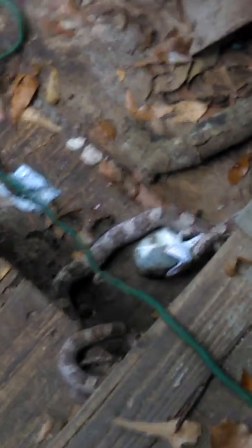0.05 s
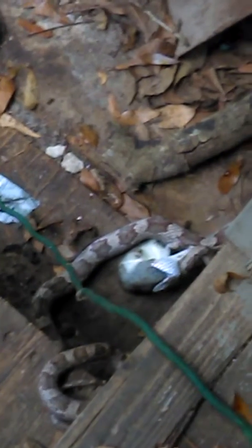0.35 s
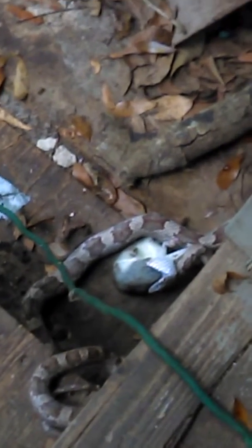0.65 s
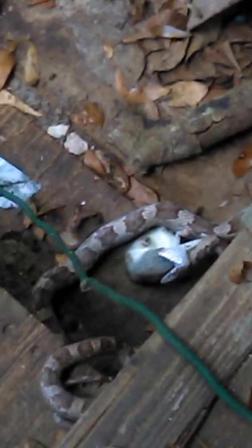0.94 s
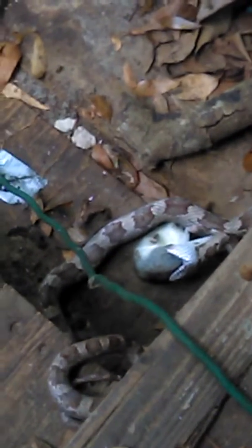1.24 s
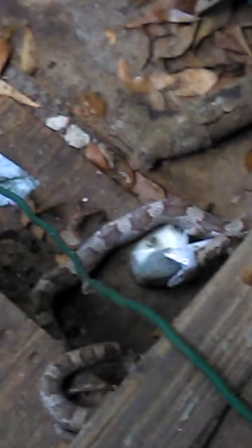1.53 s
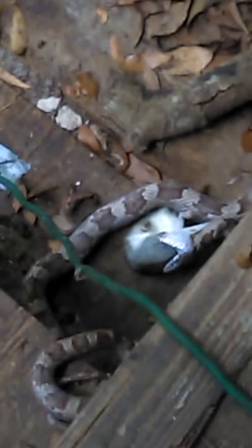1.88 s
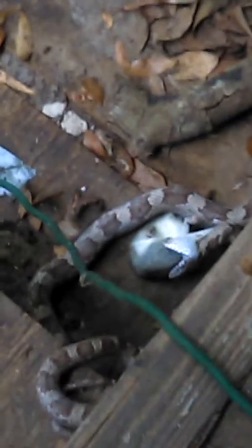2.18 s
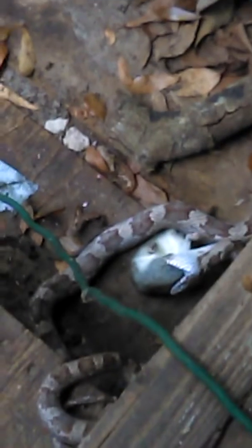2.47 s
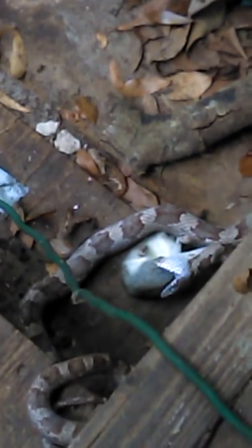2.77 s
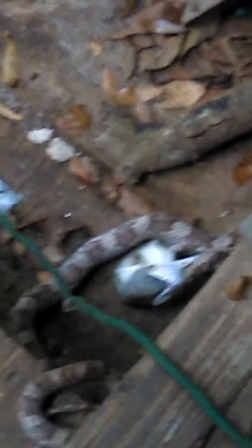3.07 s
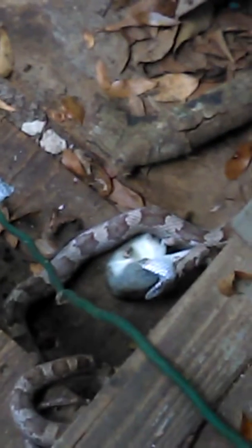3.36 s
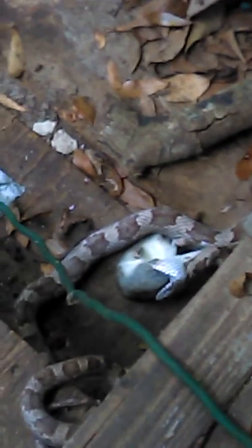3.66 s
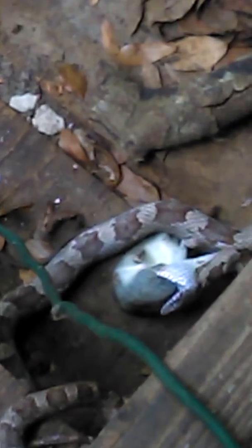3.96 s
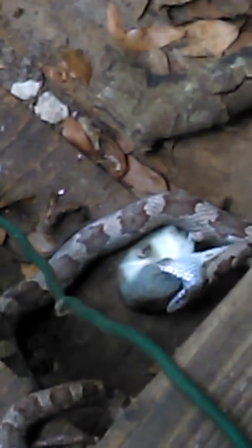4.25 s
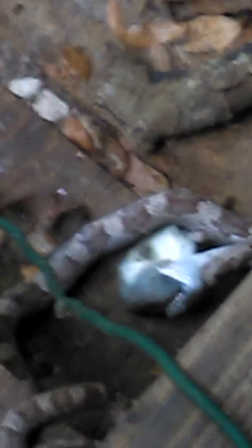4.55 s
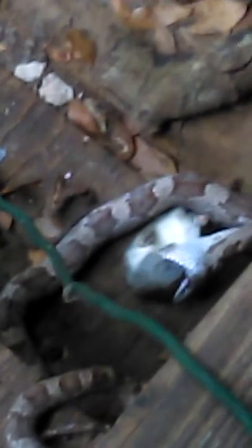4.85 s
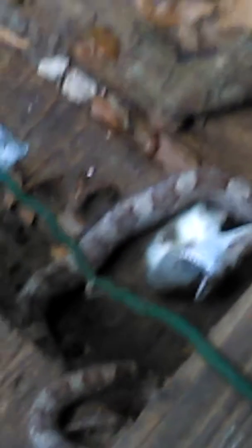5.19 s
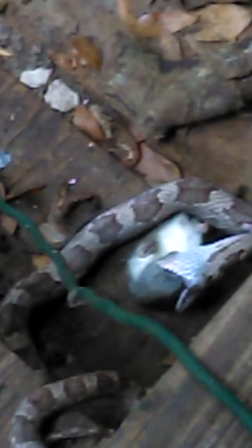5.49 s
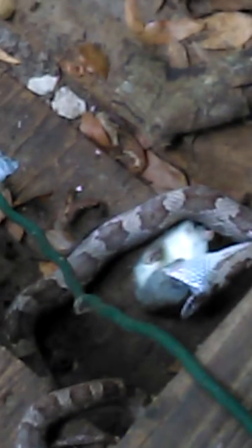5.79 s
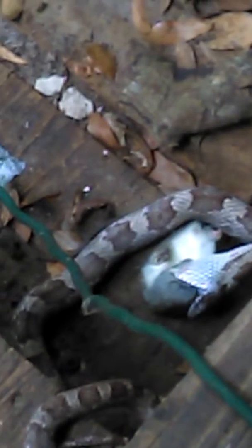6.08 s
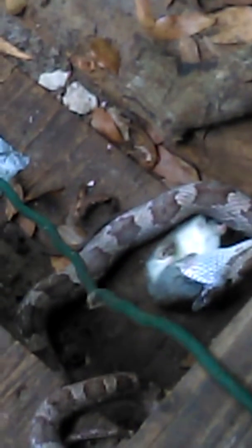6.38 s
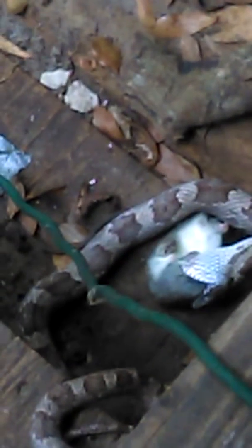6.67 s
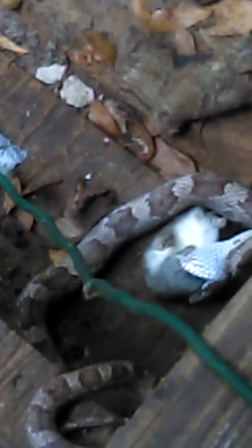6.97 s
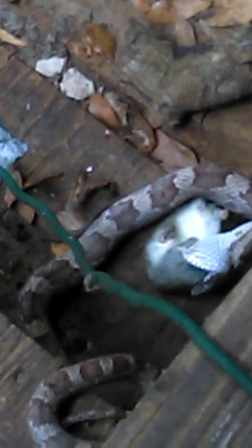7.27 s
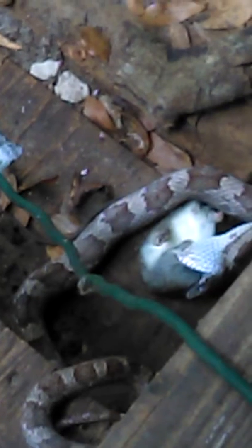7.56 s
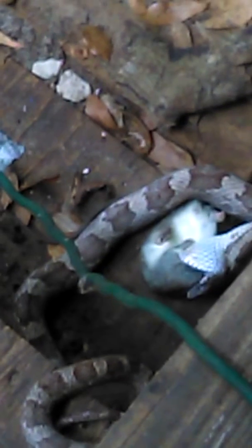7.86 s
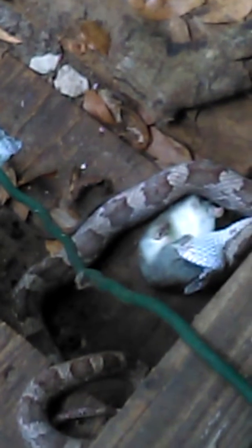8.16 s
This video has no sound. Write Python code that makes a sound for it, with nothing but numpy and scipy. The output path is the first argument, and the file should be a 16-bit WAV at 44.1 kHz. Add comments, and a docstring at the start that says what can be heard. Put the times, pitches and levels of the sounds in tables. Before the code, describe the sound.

Quiet outdoor rumble with a far hawk-like bird calling three times, faint dry leaves, one loud pop and a few microphone handling clicks.

```python
"""Hawk-like screams in a wooded yard

Over the low rumble of far traffic and a machine's faint whine, a distant bird screams three times:
a hoarse harmonic voice that slides down in pitch and echoes among the trunks.
Dry leaves rustle in short sprays of crackles. A hand-held camera ticks as its shell rings and thuds
under shifting fingers, and a voltage step pops once in the right channel."""
import sys
import numpy as np
from scipy import signal
from scipy.fft import rfft, irfft, next_fast_len
from scipy.io import wavfile

SR = 44100
rng = np.random.default_rng(int(sys.argv[2]) if len(sys.argv) > 2 else 0)


def generate_wav(sig):
    """Save sig (samples, or channels by samples) to the path in sys.argv[1] as 16-bit PCM at SR."""
    pcm = np.round(np.clip(np.atleast_2d(sig).T, -1, 1) * 32767).astype(np.int16)
    wavfile.write(sys.argv[1], SR, pcm)


N = 362943
T = np.arange(N) / SR


def amp(db):
    """Amplitude ratio of a level in decibels."""
    return 10 ** (np.asarray(db) / 20)


def unit(x):
    """Normalisation to rms 1."""
    return x / np.sqrt(np.mean(x ** 2) + 1e-20)


def read(points, hz):
    """Interpolation of a spectrum on a log-frequency axis."""
    f, value = np.transpose(points)
    return np.interp(np.log(hz + 1), np.log(f + 1), value)


def add(mix, s, sound):
    """Superposition: a sound joins the mix at time s."""
    part = mix[:, max(round(s * SR), 0):][:, :sound.shape[1]]
    part += sound[:, :part.shape[1]]


def colour(x, gain):
    """Zero-phase filtering by a gain given as a function of Hz."""
    size = next_fast_len(x.shape[-1])
    return irfft(rfft(x, size) * gain(np.fft.rfftfreq(size, 1 / SR)), size)[..., :x.shape[-1]]


def hump(hz, centre_hz, octaves):
    """A Gaussian pass band on the log-frequency axis."""
    return np.exp(-.5 * (np.log2((hz + 1) / centre_hz) / octaves) ** 2)


def wander(size, hz):
    """Random modulation: noise of rms 1, low-passed near hz."""
    return unit(colour(rng.standard_normal(size), lambda f: np.exp(-(f / hz) ** 2)))


def scatter(from_s, db, spread_db, count):
    """Jittered timing, one event in each equal slot: rows of (time [s], level [dB])."""
    place, size = rng.uniform(-1, 1, (count, 2)).T
    slots = np.arange(count) + (place + 1) / 2
    return np.column_stack([from_s + (N / SR - from_s) * slots / count, db + spread_db * size])


def traffic_and_air(flutter_db=.5, swell_db=.5):
    """Partial coherence: far traffic and hiss, alike at both ears in the bass, with droning bands."""
    # noise floor at each ear: (frequency [Hz], spectral density [dB per Hz])
    floor_left = [(15, -112), (35, -82), (56, -81.5), (92, -83), (120, -81), (155, -86), (300, -92.5),
                  (440, -93), (720, -100), (1150, -99), (1800, -103), (5600, -103.5), (9500, -112),
                  (16000, -119)]
    floor_right = [(15, -82), (35, -80), (56, -68), (92, -77), (120, -70), (155, -77.5), (300, -81.5),
                   (480, -86.5), (850, -90), (1750, -108.5), (3600, -105.5), (8300, -105), (12000, -115),
                   (16000, -120)]
    # bands of the far drone: (centre [Hz], width [Hz], left lift [dB], right lift [dB])
    drone_bands = [(129.1, 4.4, -3, 7), (316.5, 17.7, 6.5, 5), (387, 37, -5.5, -1.5), (449, 28, 7, 1.5),
                   (712, 40, 2.5, 8), (818, 10.4, 7, 7)]
    # likeness of the two ears: (frequency [Hz], correlation [-1 to 1])
    coherence = [(60, 1), (130, 0.88), (290, 0.83), (640, 0.19), (1410, 0.19), (3100, -0.24),
                 (6820, -0.044), (15000, 0.052)]
    size = next_fast_len(N, True)
    hz = np.fft.rfftfreq(size, 1 / SR)
    left, independent = rfft(rng.standard_normal((2, size)))
    shared = np.clip(read(coherence, hz), -1, 1)
    right = shared * left + np.sqrt(1 - shared ** 2) * independent
    level_db = np.array([read(floor_left, hz), read(floor_right, hz)])
    for centre, width, left_db, right_db in drone_bands:
        level_db += np.outer([left_db, right_db], 1 / (1 + (2 * (hz - centre) / width) ** 2))
    noise = irfft(np.array([left, right]) * amp(level_db), size)[:, :N] * np.sqrt(SR / 2)
    return noise * amp(flutter_db * wander(N, 18) + swell_db * wander(N, 3.1))


def machine_whine(pitch_hz=1050, waver_hz=1.77, left_db=-78.5, right_db=-80):
    """Frequency modulation: a far machine's pure tone wavers slightly in pitch."""
    cycles = np.cumsum(pitch_hz + waver_hz * wander(N, 5.6)) / SR
    return amp([[left_db], [right_db]]) * unit(np.sin(2 * np.pi * cycles))


def grip_thuds(rise_s=.0043, fade_s=.046, octaves=.73, left_db=-10, fidget_hz=72):
    """Structure-borne sound: fingers shifting on the camera make low thuds, mostly on the right."""
    # firmer bumps of the grip: (time [s], level [dB], band centre [Hz])
    bumps = [(0.389, -49, 168), (1.712, -44.5, 110), (6.945, -43, 190), (7.356, -43.5, 101)]
    out, t = np.zeros((2, N)), T[:SR // 2]
    fidgets = [(s, db, fidget_hz) for s, db in scatter(from_s=6.76, db=-47.5, spread_db=2.5, count=17)]
    envelope = (1 - np.exp(-t / rise_s)) * np.exp(-t / fade_s)
    for s, db, centre_hz in bumps + fidgets:
        thud = unit(colour(rng.standard_normal(len(t)), lambda f: hump(f, centre_hz, octaves)))
        add(out, s, thud * envelope / envelope.max() * amp([[db + left_db], [db]]))
    return out


def shell_ticks(contact_s=.00006, scrape_db=-19, scrape_t60=.029):
    """Damped modes: the camera's plastic shell rings briefly, with a scrape and a dull knock."""
    # ticks of the shell: (time [s], nominal level [dB], knock weight [ratio], left minus right [dB])
    ticks = [(1.6952, -35, 0.31, 5), (4.6125, -46, .1, 10), (4.6238, -35.5, 1, 2), (4.629, -48, 0.18, 24)]
    # ringing modes: (nominal frequency [Hz], relative level [dB], 60 dB decay time [s])
    shell_modes = [(4300, 5.5, 0.0028), (6300, 6.5, 0.0025), (9700, 3, 0.0027), (11400, 6, 0.0017)]
    knock_modes = [(300, .0086), (800, .0049)]  # (frequency [Hz], 60 dB decay time [s])
    out, t = np.zeros((2, N)), T[:SR // 20]
    for s, db, knock_weight, pan_db in ticks:
        # each mode sounds 5-13 % below nominal, differently at each tick and ear
        ring = sum(amp(level - 60 * t / t60) * np.sin(2 * np.pi * hz * rng.uniform(.87, .95, (2, 1)) * t)
                   for hz, level, t60 in shell_modes)
        ring *= 1 - np.exp(-t / contact_s)
        hiss = unit(colour(rng.standard_normal((2, len(t))), lambda f: hump(f, 5200, .67)))
        scrape = amp(scrape_db - 60 * t / scrape_t60) * hiss
        click = (ring / abs(ring).max() + scrape) * amp([[pan_db / 2], [-pan_db / 2]])
        knock = sum(np.sin(2 * np.pi * hz * t) * amp(-60 * t / t60) for hz, t60 in knock_modes)
        add(out, s, amp(db) * (click + knock_weight * knock * [[.6], [1.2]]))
    return out


def voltage_pop(at_s=.24787, gain_db=-3.5, jump=.14, rise_s=.00037, snap_hz=6800, snap_t60=.0006):
    """Step response: high-pass filters swing a voltage step in the right channel back through zero."""
    out, t = np.zeros((2, N)), T[:SR // 8]
    snap = amp(-8 - 60 * t / snap_t60) * np.sin(2 * np.pi * snap_hz * t)
    step = 1 - (1 - jump) * np.exp(-t / rise_s) + snap
    for order, hz, kind in [(2, 49, "high"), (1, 16, "high"), (2, 9500, "low")]:
        step = signal.lfilter(*signal.butter(order, hz, kind, fs=SR), step)
    add(out, at_s, np.outer([0, 1], amp(gain_db) * step))
    return out


def leaves(rise_s=.0072, fade_s=.034, grain_db=3, gain_db=2, stir_hz=7000, stir_octaves=.68):
    """Granular noise: each rustle of dry leaves is a quick spray of tiny crackles that dies away."""
    # louder rustles: (time [s], relative level [dB], band centre [Hz], width [octaves])
    rustles = [ (.312, -68, 8000, .69), (.432, -62.5, 7000, .59), (.687, -64.5, 7000, 0.6),
               (1.538, -61.5, 7000, .22), (1.603, -63, 7160, 0.48), (1.752, -62.5, 6370, .49),
               (2.825, -68, 7600, .25), (2.935, -64, 6700, 0.21), (3.241, -64.5, 7000, .75),
               (3.397, -61, 7150, .5), (3.477, -61.5, 5900, 0.24), (3.558, -64.5, 6350, 0.96),
               (4.203, -63.5, 6700, 0.51), (5.293, -66, 5000, 0.59), (5.518, -63.5, 7000, .87),
               (5.661, -66, 7500, 1), (5.902, -61.5, 6960, 1), (6.015, -61.5, 7000, 0.88),
               (6.167, -64.5, 7040, .85), (6.316, -62.5, 7000, 1), (6.858, -63.5, 7900, 0.56),
               (7.558, -64.5, 5300, .45), (7.72, -63.5, 7200, .66), (7.854, -69, 7000, .9),
               (7.967, -65, 7500, 0.73), (8.085, -64, 6500, 0.61)]
    # spectral tilt of all rustles: (frequency [Hz], gain [dB])
    tilt = [(1500, 11), (3500, -0.5), (9000, -3.5), (11500, -5.5), (13000, -11), (16000, -13)]
    # level difference between the ears: (frequency [Hz], left minus right [dB])
    balance = [(2000, 6), (5500, 5.5), (8000, -10), (10000, -3), (13000, 9)]
    out, t = np.zeros((2, N)), T[:SR // 2]
    stirs = [(s, db, stir_hz, stir_octaves) for s, db in scatter(0, db=-69.5, spread_db=1.5, count=26)]
    envelope = (1 - np.exp(-t / rise_s)) * np.exp(-t / fade_s)
    for s, db, centre_hz, octaves in rustles + stirs:
        def spectrum(f):
            """The rustle's band on a broad, weak skirt, weighted for each ear."""
            band = hump(f, centre_hz, octaves) + .15 * hump(f, 4500, .97)
            return band * amp(read(tilt, f) + np.outer([.5, -.5], read(balance, f)))

        grains = rng.standard_normal((2, len(t))) * amp(grain_db * wander(len(t), 1300))
        spray = unit(colour(grains, spectrum))
        add(out, s, amp(db + gain_db) * spray * envelope / envelope.max())
    return out


def trunk_echoes(x, t60=.8, build_s=.0087, echoes_per_s=2000):
    """Scattering: reflections from trunks build up and die away, different at each ear."""
    t = T[:SR]
    taps = rng.standard_normal((2, SR)) * (rng.random((2, SR)) < echoes_per_s / SR)
    taps *= amp(-60 * t / t60) * (1 - np.exp(-t / build_s))
    taps /= np.linalg.norm(taps, axis=1)[:, None]
    return signal.fftconvolve(x[None], taps, axes=1)[:, :N]


def scream_pitch(t, length, top_hz, hold_s=.052, slide_hz_per_s=1600):
    """Pitch glide in Hz: a quick scoop up, a short hold, a steady slide down and a last drop."""
    scoop = 125 * np.exp(-t / .0126)
    slide = slide_hz_per_s * np.maximum(t - hold_s, 0)
    drop = 288 * np.exp((t - length) / .03)
    return top_hz - scoop - slide - drop


def scream_effort(t, length, attack_s, push_db, release_s=.008):
    """Amplitude envelope: the voice starts, eases early in the slide, tires and gives a last push."""
    gate = np.minimum(t / attack_s, 1) * np.minimum((length - t) / release_s, 1)
    ease_db = -5 * np.exp(-.5 * ((t - .14) / .04) ** 2)
    tire_db = -8.5 * (t / length) ** 2.8
    push = np.exp(-.5 * ((length - t - .014) / .0088) ** 2)
    return gate * amp(ease_db + tire_db + push_db * push)


def bird(jitter=.0071, waver=.0042, shimmer_db=3, direct_db=-4, echo_db=-.5, low_edge_hz=2340):
    """Source and filter: a falling harmonic scream, hoarse with jitter and shimmer, and its echoes."""
    # screams: (time [s], length [s], top of harmonic 4 [Hz], relative level [dB], attack [s], push [dB])
    screams = [(0.367, 0.39, 3540, -65, .02, 4), (3.526, 0.33, 3530, -65, 0.018, 10),
               (5.643, .345, 3507, -61, 0.047, 7)]
    # voice spectrum, strongest at the fourth: (harmonic [number], relative level [dB])
    harmonics = [(3, -9), (4, -1), (5, -33), (6, -16), (7, -15), (8, -18)]
    voice = np.zeros((1, N))
    for s, length, top_hz, db, attack_s, push_db in screams:
        t = np.arange(0, length, 1 / SR)
        fundamental_hz = scream_pitch(t, length, top_hz) / 4
        unsteadiness = 1 + jitter * wander(len(t), 270) + waver * wander(len(t), 28)
        cycles = np.cumsum(fundamental_hz * unsteadiness) / SR
        tone = unit(sum(amp(level) * np.sin(2 * np.pi * round(k) * cycles) for k, level in harmonics))
        shimmer = unit(amp(shimmer_db * wander(len(t), 50)))
        effort = amp(db) * scream_effort(t, length, attack_s, push_db)
        add(voice, s, (tone * effort * shimmer)[None])
    # the third harmonic fades as it slides below the throat's pass band
    voice = colour(voice, lambda f: .5 + .5 * np.tanh((f - low_edge_hz) / 160))
    return amp(direct_db) * voice + amp(echo_db) * trunk_echoes(voice[0])


def scene():
    """Superposition of the yard's sounds and the camera's own noises."""
    yard = traffic_and_air() + machine_whine() + bird() + leaves()
    return yard + shell_ticks() + grip_thuds() + voltage_pop()


def record(dry, edge_hz=15800):
    """Band limiting: a linear-phase low-pass removes the highest treble."""
    low_pass = signal.firwin(511, edge_hz, window=("kaiser", 9), fs=SR)
    return signal.oaconvolve(dry, low_pass[None], "same", axes=1)


dry = scene()
out = record(dry)
generate_wav(out)
```